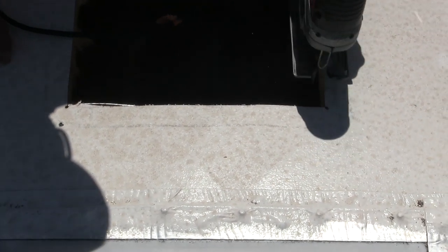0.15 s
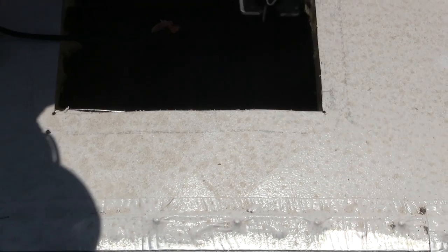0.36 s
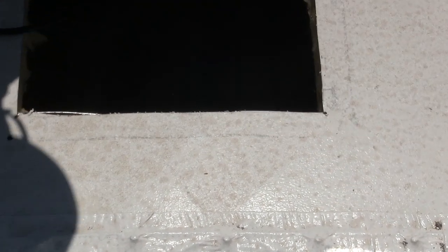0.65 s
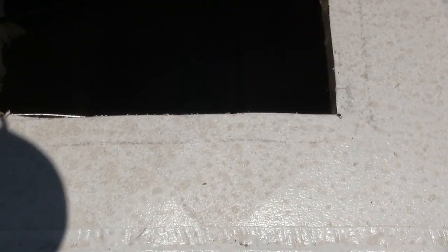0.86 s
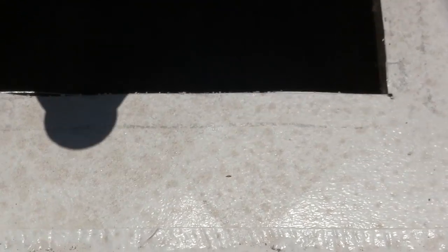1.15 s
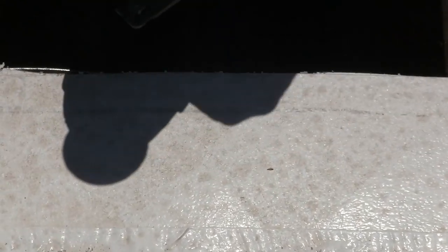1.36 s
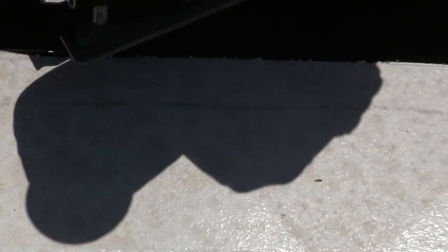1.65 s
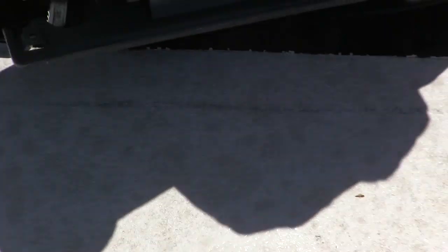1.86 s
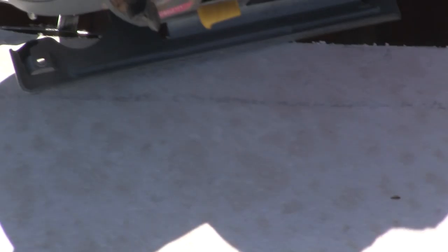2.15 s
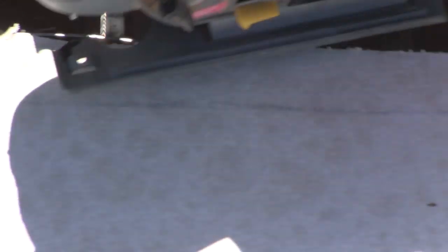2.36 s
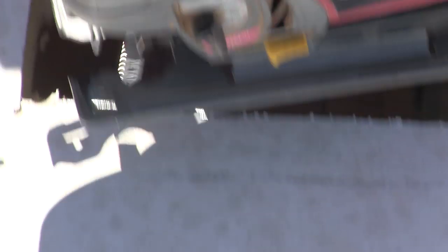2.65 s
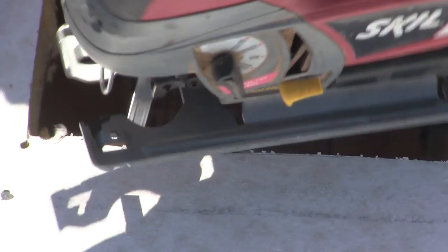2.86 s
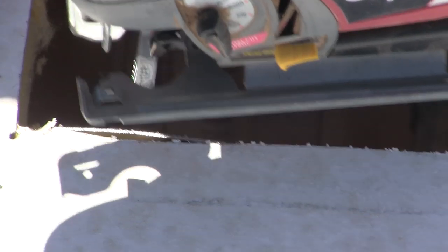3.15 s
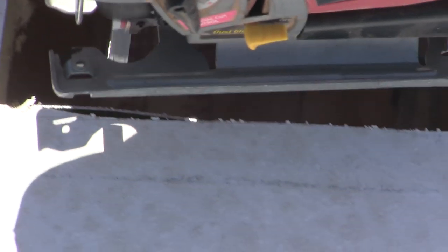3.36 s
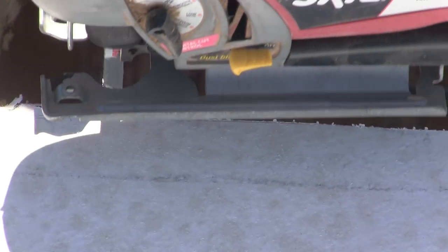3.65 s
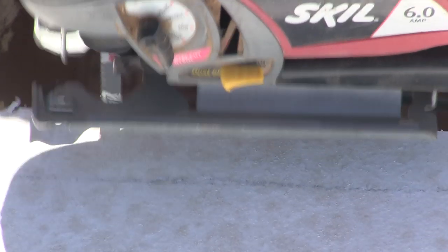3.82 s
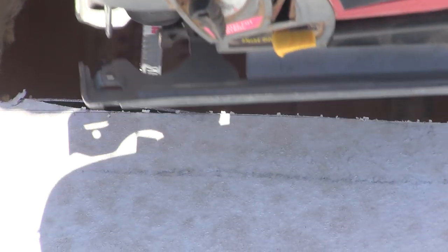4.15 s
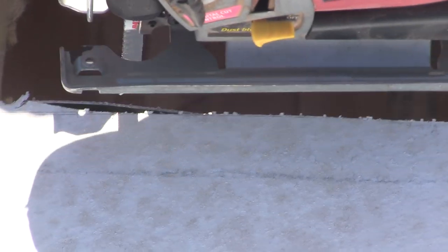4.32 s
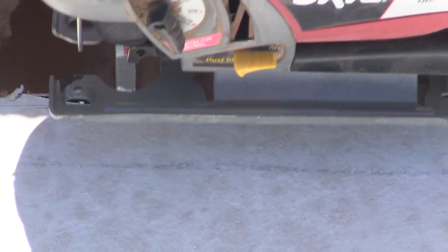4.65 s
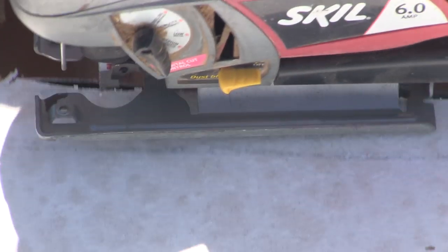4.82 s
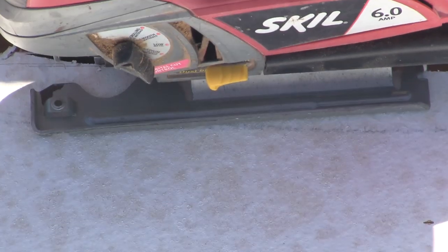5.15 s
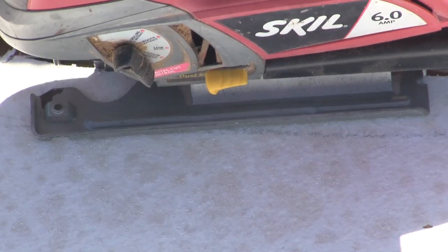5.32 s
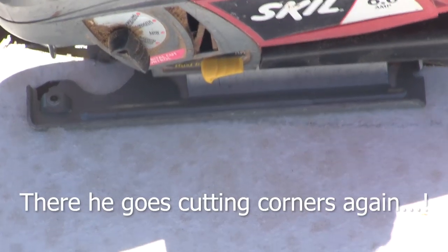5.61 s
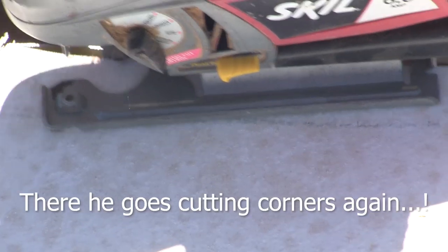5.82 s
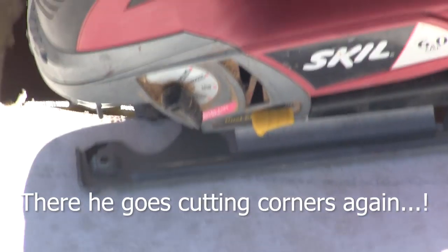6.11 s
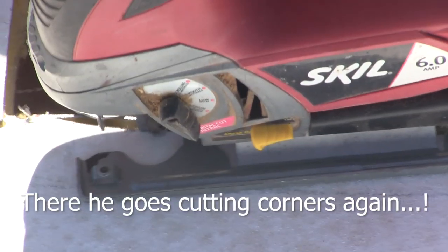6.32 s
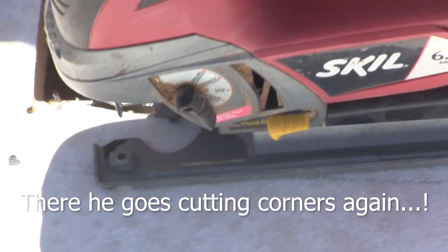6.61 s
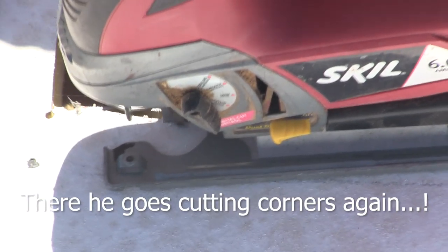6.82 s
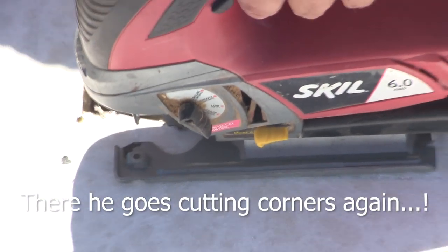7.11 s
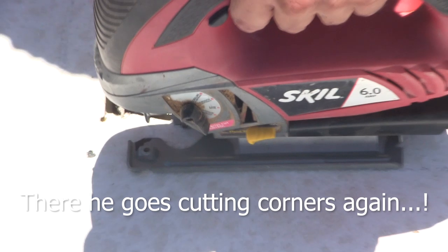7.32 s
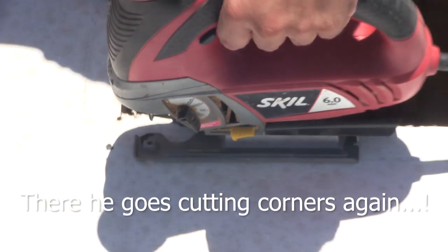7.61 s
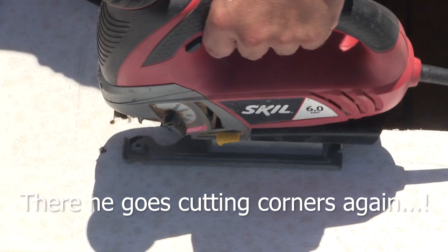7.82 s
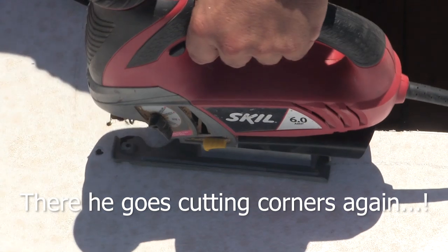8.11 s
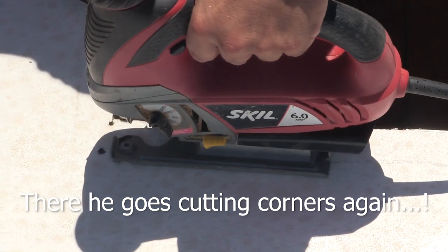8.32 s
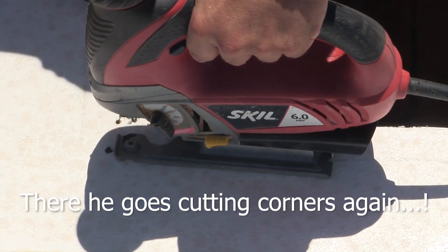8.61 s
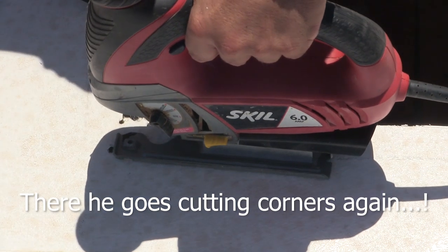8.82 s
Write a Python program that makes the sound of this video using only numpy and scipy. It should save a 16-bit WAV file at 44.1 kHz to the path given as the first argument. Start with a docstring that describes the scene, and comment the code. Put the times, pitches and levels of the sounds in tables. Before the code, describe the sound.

Close outdoor sound of a corded jigsaw on a sheet-metal roof. It has just been switched off and coasts down, hissing, rattling and whining lower, then slows to dry rasps and chirps. The shoe knocks hollowly on the sheet. After a quiet pause with faint engine hum and breeze, the trigger clicks, the motor races up chattering, and the blade cuts in a fast, gritty buzz until the end.

```python
"""A sheet-metal roof outdoors, a corded jigsaw close by. Switched off, it coasts down: hissing fan, rattling
gear and whining teeth follow the crank angle; near rest the dry teeth rasp and chirp. The shoe knocks on the
roof, ringing its modes; the trigger clicks, the saw runs up chattering on the sheet, and the blade bites once
a stroke in bursts of gritty noise that drum the sheet. The roof hums low in two sines, a faint engine tone
sounds far off, and filtered noise makes the breeze on the microphone."""
import sys
import numpy as np
from scipy import signal
from scipy.fft import rfft, irfft
from scipy.io import wavfile
from scipy.ndimage import uniform_filter1d

SR = 44100
rng = np.random.default_rng(int(sys.argv[2]) if len(sys.argv) > 2 else 0)


def log_audio(samples):
    """Write samples as a 16-bit WAV file to the path given in sys.argv[1]."""
    # one column per channel
    frames = np.atleast_2d(samples).T
    # limit to full scale, then quantise
    limited = np.clip(frames, -1, 1)
    pcm = np.round(limited * 32767).astype(np.int16)
    wavfile.write(sys.argv[1], SR, pcm)


N = 395569
T = np.arange(N) / SR
TOP_HZ = 16000

# Open air spectrum: (frequency [Hz], level [dB])
AIR_COLOUR = [(25, -32), (100, -16.5), (200, -15.5), (500, -20), (1100, -23), (2000, -34), (7000, -43),
              (12000, -44), (16000, -50)]
# Breeze rumble: (time [s], relative level [dB])
BREEZE = [(0, -66), (.45, -61), (1.2, -49.5), (1.9, -50.5), (2.8, -45), (3.2, -49), (5.45, -50.5),
          (5.7, -67), (8.97, -63)]
# Distant engine: (time [s], pitch [Hz], level [dB])
ENGINE = [(0, 121.8, -55), (1.8, 131, -80), (2.3, 130, -50.5), (4.7, 133, -46), (5.45, 144.3, -42.5),
          (5.7, 142, -72)]
# Low hum of the roof sheet, gone before the saw restarts: (frequency [Hz], level [dB])
ROOF_HUM = [(167, -43), (350, -46)]

# Roof sheet modes: (frequency [Hz], relative level [dB], t60 at damping 1 [s])
ROOF_MODES = [(174.2, -7.5, 0.19), (210.8, -3, 0.14), (236.8, -6.5, 0.19), (260.5, -2, 0.1),
              (302.2, 2.5, 0.12), (351.3, -4, 0.25), (363.3, -2.5, 0.2), (405.2, -4, 0.16), (554, -1, 0.06),
              (643, -8.5, 0.38), (752.5, -9, 0.33), (932, 8, 0.024), (1067, 5.5, 0.068), (1188, -2.5, 0.1),
              (1263, 2.5, 0.036)]
# Shoe knocks: (time [s], thud [dB], clack [dB], contact time [s], deck boom [dB])
KNOCKS = [(0.035, -23.5, -30, 0.0007, -38), (0.11, -26, -38, 0.0013, -35),
          (2.643, -22.5, -17, 0.00052, -25), (2.696, -32, -27, 0.0006, -29),
          (2.881, -16, -23.5, 0.0004, -20), (2.91, -28, -39, 0.002, -23), (2.935, -28, -47, 0.0014, -18.5),
          (3.898, -19, -22, 0.00053, -23), (3.922, -25, -28, 0.00037, -27),
          (3.945, -25.5, -42, 0.0011, -25), (4.87, -26, -41.5, 0.0008, -50), (4.912, -22, -37, 0.0011, -27),
          (4.93, -19.5, -39, 0.00086, -37), (4.951, -33, -42, 0.00083, -36), (5.033, -26, -39, 0.0011, -35),
          (5.046, -25, -47, 0.0017, -43), (5.519, -14, -21.5, 0.00038, -39), (5.531, -23, -30, 0.0012, -36),
          (5.556, -25, -25, 0.00091, -43), (5.586, -17.5, -20.5, 0.00048, -43),
          (5.621, -24, -30, 0.00065, -45)]
# Blade guide and trigger clicks: (time [s], level [dB])
CLICKS = [(1.72, -15.5), (2.046, -24), (2.727, -17), (2.791, -19), (3.213, -23), (3.327, -25.5),
          (3.461, -22.5), (3.946, -31.5), (3.978, -30), (4.215, -52), (4.436, -44), (5.437, -44),
          (5.494, -27)]
# Steel clack spectrum: (frequency [Hz], level [dB])
CLACK_COLOUR = [(300, -51), (1100, 1), (2000, 15), (3800, 11.5), (6000, 7), (9000, -1.5), (14000, 0.5),
                (16000, -13)]
# Roof rattle after a knock, spectrum: (frequency [Hz], level [dB])
KNOCK_COLOUR = [(80, -14), (190, -6), (350, 8), (600, -6), (800, -11), (1150, -4.5), (1450, -16),
                (2500, -26.5), (12000, -52)]
# Boom of the deck under the sheet, spectrum: (frequency [Hz], level [dB])
BOOM_COLOUR = [(50, -6), (100, -9.5), (160, -6), (220, 5.5), (290, -1), (400, -23), (900, -25), (4000, -70)]
KNOCK_RATTLE_DB, KNOCK_TAIL_T60_S = -9, .8  # rattle relative to thud
# A dented sheet is stiffer: pitch starts sharp by this share of its final value and slides down
DENT_SHARP_SHARE, DENT_S = .16, .06

# Sheet singing under the resting shoe: (time [s], relative level [dB])
SINGING = [(2.13, -51), (2.45, -42), (2.8, -43), (3.1, -33), (3.28, -36), (3.45, -49)]
# Sheet tones kept alive by the shoe: (frequency [Hz], relative level [dB], phase wobble [rad])
SUNG = [(348, 7, 1), (1055, -7, 0.82)]
SING_FLUTTER_DB, SING_SWELL_MAX_DB = 4, 3

# Saw shaking, strongest near the armature's turn and its doubles: (multiple of stroke rate, level [dB])
SHAKE = [(4, -5), (5, -6), (7, 0), (8, -7), (9, -3), (12, -18), (13, 2), (15, 2), (16, -20), (19, -5.5),
         (23, -8), (28, 4), (30, -3), (36, -3.5)]
# Shaken sheet, leaving the last cut and running up: (time [s], relative level [dB])
GROWL = [(0, -34.5), (0.13, -34), (0.26, -75), (5.5, -83), (5.54, -29.5), (5.63, -27.5), (5.68, -35),
         (5.78, -33.5), (5.9, -25.5), (6.0, -26), (6.08, -35), (6.22, -27.5), (6.4, -42)]
# Growl passed by the sheet: (frequency [Hz], gain [dB])
GROWL_COLOUR = [(130, -36), (205, -8.5), (340, 1), (480, 2), (620, -0.5), (730, -6.5), (950, 3.5),
                (1150, -6), (2000, -9)]
# Sheet jolts during run-up: (time [s], tone [Hz], peak level [dB])
JOLTS = [(5.66, 930, -22), (5.69, 950, -13.5), (5.73, 980, -13.5), (5.76, 1020, -15), (5.79, 1050, -14),
         (5.83, 1080, -24), (6.0, 1080, -18), (6.06, 1050, -23), (6.14, 1040, -19), (6.29, 1020, -22)]
# Shoe contact with the sheet: (start [s], length [s], relative level [dB], release [dB/s])
SCRAPES = [(0.001, 0.14, -28, 116), (2.167, 0.99, -31, 53), (4.008, 0.013, -29.5, 40),
           (5.092, .02, -46.5, 70), (5.534, 0.11, -22.5, 39), (5.856, 0.23, -21.5, 75),
           (6.123, 0.053, -23, 132)]
# Chatter spectrum: (frequency [Hz], level [dB])
CHATTER_COLOUR = [(120, -21), (180, -19), (330, 3.5), (480, 2), (620, -0.5), (760, 4), (920, -1),
                  (1080, -3), (1350, -7.5), (1900, -9), (4000, -19), (12000, -42)]
SCRAPE_ATTACK_S = 0.043

# Coasting: dry friction [strokes/s^2] and drag bring the blade to rest at STOP_S
FRICTION, DRAG_S, STOP_S = 4.547, 4.3007, 4.8312
# The fan brakes away the top of the speed [strokes/s]; the crank begins at FIRST_TURN [strokes]
FAN_SPEED, FAN_BRAKE_S, FIRST_TURN = 2.4, .45, .795
START_S, PARKED_TURN = 5.5, .157  # motor restart; crank position there [strokes]
# Blade under power: (time [s], speed [strokes/s])
DRIVE = [(5.5, 0), (5.6, 24.01), (5.72, 34.51), (5.85, 39.71), (6.0, 43.03), (6.25, 46.5), (6.7, 46.45),
         (7.7, 46.14), (8.3, 46.06), (9.0, 46.49)]
# Coasting saw swung towards the microphone: (time [s], gain [dB])
NEARNESS = [(0, -13.5), (.28, -11.5), (.9, -2), (1.25, 0), (1.7, -1.5), (2.4, 2.5), (3, 0.5), (4, 1.5),
            (4.6, -2)]

# Blade tick on its guide roller, spectrum: (frequency [Hz], level [dB])
TICK_COLOUR = [(3000, -22), (7500, -11), (9600, 17), (11000, -23), (13500, -14), (16000, 13)]
# Gear on the last slow lifts: (time [s], rasp [dB], chirp [dB])
RASP = [(2.05, -35, -42), (2.25, -28, -38), (2.4, -26, -36), (2.55, -22.5, -24), (2.65, -28, -25),
        (2.74, -29, -20), (2.83, -23.5, -23), (2.9, -32, -40), (3.0, -31, -30), (3.1, -31, -36),
        (3.45, -29.5, -50), (3.76, -30, -52), (3.9, -42, -60)]
# Rasp spectrum: (frequency [Hz], level [dB])
RASP_COLOUR = [(900, -24), (1400, -8), (1680, 3), (2150, -5), (2520, -1), (2850, 4), (3300, -11),
               (5500, -16), (16000, -38)]

# Motor and gearbox running up: (time [s], level [dB], relative treble above 6.5 kHz [dB])
RUN_UP = [(5.52, -28, -18), (5.59, -23, -12), (5.68, -25.5, -8), (5.78, -29.5, -7.5), (5.88, -21, -5.5),
          (5.96, -23, -9), (6.05, -28, -6.5), (6.15, -25, -8)]
# Motor under load: (time [s], relative level [dB])
UNDER_LOAD = [(6.3, -26), (7.2, -24), (7.7, -19.5), (8.97, -18.5)]
# Gear backlash closing: (phase [strokes], width [strokes], level [dB])
BACKLASH = [(-0.068, 0.17, -6), (-0.364, 0.016, -4.5), (0.366, 0.039, -4), (-0.083, 0.014, 1.5)]
# Open gear rattle spectrum: (frequency [Hz], level [dB])
RATTLE_COLOUR = [(59, -53), (100, -19), (147, -26), (255, -10.5), (335, -11), (424, -5.5), (570, -12),
                 (736, -4.5), (1150, -0.5), (2300, 0), (3400, 0.5), (8110, -13.5), (10500, -21),
                 (13800, -18), (16000, -27.5)]
# Loaded motor spectrum: (frequency [Hz], level [dB])
LOADED_COLOUR = [(59, -69), (100, -27), (202, -4), (389, -1), (570, -5.5), (801, -3), (1060, -1),
                 (1310, -1), (2040, -11), (2470, -5.5), (3320, -9.5), (5190, -13.5), (10700, -24.5),
                 (13200, -19), (16000, -25)]
# Gear housing modes: (frequency [Hz], relative level [dB], t60 [s])
HOUSING_MODES = [(1190, -1, 0.035), (2630, 8.5, 0.027), (5280, 14.5, 0.013), (6330, 6, 0.052),
                 (10000, 3, 0.016)]
REF_SPEED = 26  # strokes/s, where the coasting levels below hold before NEARNESS
RATTLE_DB, RATTLE_POWER, RATTLE_TREBLE_DB, TREBLE_POWER = -21, 1.133, 8, 0.51  # powers of speed

# Gearbox resonances swept by the whine partials: (frequency [Hz], gain [dB])
GEARBOX_RESONANCES = [(400, -26.5), (890, -13), (1090, -7), (1205, -7), (1340, -2), (1470, -1.5),
                      (1640, -10.5), (1850, -0.5), (2020, -3), (2290, -2), (2550, -4), (3500, -6.5),
                      (4400, -0.5), (5600, -6.5), (7300, -0.5), (8600, -6), (16000, -14)]
# Coasting whine fundamental, as the saw is swung round: (time [s], gain [dB])
WHINE_SWELL = [(0, 3), (.25, 1), (.48, -13), (.6, 1), (.68, -8), (.78, 1.5), (1.04, 1.5), (1.12, -10),
               (1.27, -6), (1.37, 1.5), (1.65, 1), (1.8, 5.5), (1.97, -8), (2.15, -2)]
CRANK_TEETH = 63
WHINE_DB, WHINE_FULL_SPEED, WHINE_POWER = -18.5, 23, 1  # coasting; speed [strokes/s]
RUN_WHINE_DB, HUSH_S, HUSH_DB_PER_S = -22.5, 6, 20  # the load presses the teeth together from HUSH_S
WHINE_SLOPE, MESH_JITTER_RAD = 1., .12  # partials fall as 1 / number ** slope
SCRAPE_SPEED, SCRAPE_JITTER_RAD = 17, 1.8  # below this [strokes/s] teeth scrape rather than sing
OVERTONE_FLICKER_DB = 3

# Push into the cut: (time [s], relative bite level [dB])
FEED = [(6.2, -22.5), (6.32, -25), (6.65, -25.5), (7.05, -25), (7.28, -29), (7.4, -26.5), (7.56, -24),
        (7.8, -24), (7.88, -26), (8.12, -24.5), (8.22, -30), (8.28, -28), (8.52, -26.5), (8.68, -24.5),
        (8.76, -25.5), (8.86, -24), (8.97, -30.5)]
# Sheet drumming more as the cut frees it: (time [s], relative level [dB])
FREEDOM = [(6.2, -25), (6.55, -12), (6.75, -9), (7.2, -8.5), (7.6, -3.5), (8.97, -1.5)]
# Strokes with a bite size of their own, nearly all skating: (time [s], size [dB])
SKATES = [(6.893, -11), (6.937, -27), (7.021, -4), (7.067, -30), (7.087, 1), (7.153, -19), (7.652, -12),
          (7.89, -11), (7.933, -4)]
# Bite spectrum: (frequency [Hz], level [dB])
BITE_COLOUR = [(200, -35), (700, -8), (1050, 5), (1400, -6.5), (2000, -4.5), (2550, 2), (3200, -4.5),
               (3800, -2.5), (4400, -4.5), (5100, -4), (7500, -12.5), (9000, -15), (11000, -22),
               (13200, -15), (16000, -25)]
# Low boom of the sheet beyond the shoe: (frequency [Hz], gain [dB])
DRUM_COLOUR = [(80, 5), (120, -8), (165, 1.5), (275, 1), (325, 0), (390, 1.5), (520, -15), (700, -5),
               (900, -28), (2000, -33)]
# Blade and guide roller modes: (frequency [Hz], relative level [dB], t60 [s])
BLADE_MODES = [(1848, 7.5, 0.049), (2420, 9, 0.0058), (2660, 2, 0.012), (3725, 17.5, 0.014),
               (5560, -19, 0.014)]
# Blade ringing more freely late in the cut: (time [s], relative level [dB])
BLADE_RING = [(8.35, -13), (8.8, -2.5)]
BITE_START, BITE_RISE, BITE_DECAY = -.165, .06, .175  # strokes


def undb(db):
    """Decibels to gain."""
    return 10 ** (np.asarray(db) / 20)


def unit(x):
    """Scale to rms 1."""
    return x / np.sqrt(np.mean(x ** 2))


def curve(rows, axis=1):
    """One table column, joined by straight lines."""
    rows = np.asarray(rows)
    return np.interp(T, rows[:, 0], rows[:, axis])


def during(rows, fade_s):
    """1 over the time a table covers, fading outside it."""
    return np.clip(1 + np.minimum(T - rows[0][0], rows[-1][0] - T) / fade_s, 0, 1)


def sine(cycles, wobble_rad=0):
    """Sine of a phase in cycles, plus a wobble."""
    return np.sin(2 * np.pi * cycles + wobble_rad)


def noise():
    """White noise."""
    return rng.standard_normal(N)


def walk(rate_hz):
    """Smooth random wander, rms 1."""
    hold = max(int(SR / rate_hz), 2)
    steps = np.repeat(rng.standard_normal(N // hold + 1), hold)
    return unit(uniform_filter1d(steps, hold)[:N])


def fade(t, t60_s):
    """Exponential decay from t = 0."""
    return (t >= 0) * undb(-60 * np.maximum(t, 0) / t60_s)


def colour(x, points, size=4096):
    """Causal minimum-phase filter with the given (frequency [Hz], gain [dB]) outline."""
    hz, db = np.transpose(points)
    f = np.maximum(np.fft.rfftfreq(size, 1 / SR), 1)
    below = np.minimum(f / hz[0], 1) ** 2
    gain = below * undb(np.interp(np.log(f), np.log(hz), db))
    cepstrum = irfft(np.log(gain))
    # fold the cepstrum to its causal half
    cepstrum[1:size // 2] *= 2
    cepstrum[size // 2 + 1:] = 0
    return signal.fftconvolve(x, irfft(np.exp(rfft(cepstrum))))[:N]


def cut_off(x, hz, kind, order=2):
    """Low-pass, high-pass or band-pass."""
    return signal.sosfilt(signal.butter(order, hz, kind, fs=SR, output="sos"), x)


def grit(rate_hz, depth_db):
    """Noise made of grains; each band has grains of its own."""
    edges_hz = [60, 900, 2000, 4000, 8000, 17000]
    total = 0
    for pair in zip(edges_hz, edges_hz[1:]):
        total = total + cut_off(noise(), pair, "band") * undb(depth_db * walk(rate_hz))
    return total


def lobe(turn, at, width):
    """A smooth bump once a stroke; position and width in strokes."""
    return np.exp(-.5 * (((turn - at + .5) % 1 - .5) / width) ** 2)


def ring_of(force, damping=1, modes=ROOF_MODES):
    """A force rings decaying modes; damping divides their t60."""
    t = T[:SR]
    ring = 0
    for k, (hz, db, t60_s) in enumerate(modes):
        ring = ring + (-1) ** k * undb(db) * fade(t, t60_s / damping) * sine(hz * t)
    return signal.fftconvolve(force, ring / np.std(ring[:SR // 50]))[:N]


def crank():
    """Crank angle [strokes] and speed [strokes/s]: coasting to rest, then driven again."""
    left_s = np.maximum(STOP_S - T, 0)
    coast = FRICTION * DRAG_S * np.expm1(left_s / DRAG_S)
    coast += FAN_SPEED * np.exp(-(T / FAN_BRAKE_S) ** 1.5)
    drive = curve(DRIVE)
    coast_turn = FIRST_TURN + np.cumsum(coast) / SR
    drive_turn = PARKED_TURN + np.cumsum(drive) / SR
    return np.where(T < START_S, coast_turn, drive_turn), coast + drive


def mesh(turn):
    """Tooth contact phase [rad]: the crank gear turns once a stroke."""
    return 2 * np.pi * CRANK_TEETH * turn


def outdoors(air_db=-48, waver_share=0.01, breeze_db=2, gust_db=-2.0):
    """Air noise, a wavering engine tone, two humming roof modes and low breeze noise on the microphone."""
    engine_hz, engine_db = curve(ENGINE), curve(ENGINE, axis=2)
    air = unit(colour(noise(), AIR_COLOUR)) * undb(air_db + 0.57 * walk(7.3))
    engine = np.sqrt(2) * sine(np.cumsum(engine_hz * (1 + waver_share * walk(16))) / SR)
    engine *= undb(engine_db + 0.78 * walk(11))
    roof_hum = sum(undb(db + 2.5 * walk(5)) * sine(hz * T, .8 * walk(12)) for hz, db in ROOF_HUM)
    roof_hum *= np.clip((5.3 - T) / 0.36, 0, 1)
    presence = undb(np.minimum(engine_db + 45, 0))  # air and roof hum sink with the engine
    breeze = unit(colour(noise(), [(20, -6), (45, -16.0), (90, -11), (200, -17.0), (800, -60.5)]))
    breeze *= undb(curve(BREEZE) + breeze_db + gust_db * walk(2.94))
    return (air + roof_hum) * presence + engine + breeze


def blow(contact_s, spot_db=3, damping=1.13):
    """Sheet ring sliding down in pitch; spots favour other modes, long contact drops high ones."""
    t = T[:SR // 2]
    spots_db = spot_db * rng.standard_normal(len(ROOF_MODES))
    slide_s = t - DENT_SHARP_SHARE * DENT_S * np.expm1(-t / DENT_S)
    slide_s /= 1 + DENT_SHARP_SHARE / 2  # centre the slide on the mode pitch
    ring = 0
    for k, (hz, db, t60_s) in enumerate(ROOF_MODES):
        ring = ring + (-1) ** k * undb(db + spots_db[k]) * fade(t, t60_s / damping) * sine(hz * slide_s)
    push = signal.windows.hann(int(contact_s * SR) + 3)
    return signal.fftconvolve(ring / np.std(ring[:SR // 50]), push / push.sum())


def knocks(clack_t60_s=0.089, click_t60_s=0.05, rattle_t60_s=0.27, tail_db=-21, ring_db=-1.5, boom_t60_s=0.15):
    """Knocks: steel clack, sheet ring, deck boom and spreading roof rattle; clicks: short steel noise."""
    body, clack, rattle_power, boom_power = np.zeros((4, N))
    t = T[:SR]
    spread = undb(KNOCK_RATTLE_DB) * fade(t, rattle_t60_s) + undb(tail_db) * fade(t, KNOCK_TAIL_T60_S)
    for s, thud_db, clack_db, contact_s, boom_db in KNOCKS:
        at, ring = int(s * SR), blow(contact_s)
        body[at:at + len(ring)] += undb(thud_db) * ring
        boom_power[at:at + SR] += (undb(boom_db) * fade(t, boom_t60_s)) ** 2
        clack[at:at + SR] += undb(clack_db) * fade(t, clack_t60_s)
        rattle_power[at:at + SR] += (undb(thud_db) * spread) ** 2
    for s, db in CLICKS:
        at = int(s * SR)
        clack[at:at + SR] += undb(db) * fade(t, click_t60_s)
    steel = clack * unit(colour(noise(), CLACK_COLOUR))
    deck = np.sqrt(boom_power) * unit(colour(noise(), BOOM_COLOUR))
    sheet = undb(ring_db) * cut_off(body, 84, "high")
    rattle = np.sqrt(rattle_power) * unit(colour(noise(), KNOCK_COLOUR))
    return steel + deck + sheet + rattle


def singing(turn, throb=0.082):
    """Two sheet modes hum under the rocking shoe, fluttering and throbbing with the stroke."""
    tone = 0
    for hz, db, wobble_rad in SUNG:
        flutter_db = np.minimum(SING_FLUTTER_DB * walk(25.06), SING_SWELL_MAX_DB)
        tone = tone + undb(db + flutter_db) * sine(hz * T, wobble_rad * walk(30))
    throbbing = unit(tone * (1 + throb * np.cos(2 * np.pi * turn)))
    return throbbing * undb(curve(SINGING) + 1.5) * during(SINGING, .04)


def growl(turn, top_multiple=36):
    """The racing saw shakes the sheet each stroke: harmonics of the stroke rate climb with speed."""
    multiples, db = np.transpose(SHAKE)
    on = during(GROWL, 0.048)
    live = on > 0
    tones = np.zeros(N)
    for k in range(int(round(multiples[0])), top_multiple + 1):
        wobble_rad = rng.uniform(0, 2 * np.pi) + .7 * walk(60)[live]
        tones[live] += undb(np.interp(k, multiples, db)) * sine(k * turn[live], wobble_rad)
    return colour(tones, GROWL_COLOUR) * undb(curve(GROWL)) * on


def jolts(turn, at=0.01, width=0.13, wobble_rad=0.42):
    """A plunger reversal each stroke makes the sheet sing out briefly as the saw gathers speed."""
    tone = sine(np.cumsum(curve(JOLTS)) / SR, wobble_rad * walk(200))
    return tone * lobe(turn, at, width) * undb(curve(JOLTS, axis=2)) * during(JOLTS, .02)


def chatter(turn, grain_db=1.5, slap=0.086, ring_db=-2, level_db=-3):
    """The loosely held shoe scrapes the sheet and slaps it twice a stroke, ringing its modes."""
    force = grit(300, grain_db) * (1 + slap * lobe(2 * turn, 0, 0.29))
    sound = unit(colour(force, CHATTER_COLOUR)) + undb(ring_db) * unit(ring_of(force, damping=0.34))
    contacts = []
    for s, length_s, db, release_db_per_s in SCRAPES:
        attack = np.clip(1 + (T - s) / SCRAPE_ATTACK_S, 0, 1)
        contacts.append(attack * undb(db - release_db_per_s * np.maximum(T - s - length_s, 0)))
    return cut_off(sound, 176, "high", order=6) * np.max(contacts, axis=0) * undb(level_db)


def ticking(turn, at=-0.32, width=0.0063, scatter_db=3, level_db=-31):
    """While the saw coasts, the loose blade ticks on its roller once a stroke: short noise bursts."""
    stroke = turn.astype(int)
    size = undb(scatter_db * rng.standard_normal(stroke.max() + 1))[stroke]
    swinging = np.clip((STOP_S - .6 - T) / .5, 0, 1)  # too slow to tick near the end
    ticks = unit(colour(noise(), TICK_COLOUR)) * lobe(turn, at, width) * size
    return ticks * swinging * undb(level_db + curve(NEARNESS))


def rasp(turn, start=-0.17, rise=0.036, hold=0.38, release=0.11, tooth_depth=0.26, wobble_rad=0.25):
    """Near rest each plunger lift loads the dry teeth: they rasp, and chirp at twice the tooth rate."""
    phase = (turn - start) % 1
    load = np.minimum(phase / rise, 1) * np.exp(-np.maximum(phase - hold, 0) / release - phase)
    toothed = grit(400, 0.95) * (1 + tooth_depth * np.cos(mesh(turn)))
    grains = unit(colour(toothed, RASP_COLOUR)) * undb(curve(RASP))
    chirp = np.sin(2 * mesh(turn) + wobble_rad * walk(250)) * undb(curve(RASP, axis=2))
    return load * during(RASP, .05) * (grains + chirp)


def gearbox(turn, speed, steady_db=-1, grain_db=3, tooth_depth=0.2, load_db=-4.5, run_treble_db=11):
    """Brushes and fan hiss; the loose gear rattles at plunger reversals, softer and duller when slow."""
    hiss = undb(steady_db) * (1 + (speed / 40) ** 4)  # the fan takes over at speed
    clusters = hiss + sum(undb(db) * lobe(turn, at, width) for at, width, db in BACKLASH)
    teeth = 1 + tooth_depth * (np.cos(mesh(turn)) + .5 * np.cos(2 * mesh(turn)))
    envelope = clusters / (hiss + .5) * teeth
    # the gear rattles openly and also rings its housing
    gear, case = (unit(colour(grit(400, grain_db) * envelope, RATTLE_COLOUR)) for _ in range(2))
    rattle = unit(gear + undb(-10.5) * unit(ring_of(case, modes=HOUSING_MODES)))
    treble = signal.sosfiltfilt(signal.butter(2, 6500, "high", fs=SR, output="sos"), rattle)
    lower = rattle - treble

    pace = speed / REF_SPEED * (T < START_S)
    coasting = lower + treble * undb(RATTLE_TREBLE_DB) * pace ** TREBLE_POWER
    coasting *= pace ** RATTLE_POWER * undb(RATTLE_DB + curve(NEARNESS))
    starting = lower + treble * undb(curve(RUN_UP, axis=2) + run_treble_db)
    starting *= undb(curve(RUN_UP)) * (T > RUN_UP[0][0]) * during(RUN_UP, 0.28)
    loaded = unit(colour(grit(300, 2.95), LOADED_COLOUR)) * undb(curve(UNDER_LOAD) + load_db)
    return coasting + starting + loaded * during(UNDER_LOAD, 0.4)


def whine(turn, speed, flutter_rad=0.74, smear_speed=38, racing_duller_db=4, width=0.08,
          steady=0.0068, overtone_steady=0.27, partials=8):
    """Teeth sing most on the lift, overtones all stroke; bursts merge at speed, roughen under power."""
    racing = (speed / smear_speed) ** 4
    powered = T > START_S
    hz, db = np.transpose(GEARBOX_RESONANCES)
    tooth_hz = np.maximum(CRANK_TEETH * speed, 1)
    crawling = np.maximum(1 - speed / SCRAPE_SPEED, 0)
    jitter_rad = MESH_JITTER_RAD + SCRAPE_JITTER_RAD * crawling + flutter_rad * powered
    phase = mesh(turn) + jitter_rad * walk(300) + .5 * walk(40)
    lift = unit(lobe(turn, 0.012, width)) ** 2
    teeth = 0
    for k in range(1, partials + 1):
        partial_hz = k * tooth_hz
        even = np.clip(racing + (overtone_steady if k > 1 else steady), 0, 1)
        answer_db = np.interp(np.log(partial_hz), np.log(hz), db)
        if k > 1:
            answer_db += OVERTONE_FLICKER_DB * walk(22.15) - racing_duller_db * racing
        else:
            answer_db += ~powered * curve(WHINE_SWELL)
        tone = np.cos(k * phase + rng.uniform(0, 2 * np.pi)) * np.sqrt(even + (1 - even) * lift)
        teeth += tone * undb(answer_db) * (partial_hz < TOP_HZ) / k ** WHINE_SLOPE
    run_db = RUN_WHINE_DB - HUSH_DB_PER_S * np.maximum(T - HUSH_S, 0)
    level_db = np.where(powered, run_db, WHINE_DB + curve(NEARNESS))
    # under power it only comes through near full speed; crawling teeth fall silent
    coasting = np.minimum(speed / WHINE_FULL_SPEED, 1) ** WHINE_POWER
    coasting *= np.minimum(speed / SCRAPE_SPEED, 1) ** 2
    return teeth * np.where(powered, np.minimum(racing, 1) ** 2, coasting) * undb(level_db)


def catches(phase, uneven=0.3, teeth_per_stroke=30):
    """Tooth after tooth catches the sheet edge: a run of sharp, unevenly timed snaps."""
    tooth = np.floor(teeth_per_stroke * phase + uneven * walk(1200))
    return unit((np.diff(tooth, prepend=0) > 0) * 1.)


def cutting(turn, scatter_db=0.4, snap_db=-4.0, crack_db=16, bite_db=2.0, drum_db=-2, ring_db=-6.5, loose=0.022):
    """On each upstroke the teeth tear the metal, ring the blade and jerk the sheet, which drums."""
    stroke, phase = np.divmod(turn - BITE_START + .008 * walk(40) + 1, 1)
    stroke = stroke.astype(int)
    size_db = scatter_db * rng.standard_normal(stroke.max() + 1)
    for s, db in SKATES:
        size_db[stroke[int(s * SR)]] = db
    size = undb(size_db)[stroke]
    grip = np.minimum(phase / BITE_RISE, 1) ** 2 * np.exp(-np.maximum(phase - BITE_RISE, 0) / BITE_DECAY)
    inside = during(FEED, 0.033)
    active = inside > .5
    snaps = undb(snap_db) * catches(phase)
    # the first tooth cracks into the edge
    jerk = np.diff((phase > BITE_RISE) * 1., prepend=0).clip(0) * size
    crack = undb(crack_db) * jerk
    tear, flex = (colour((unit(grit(500, 2.8)) + snaps) * grip * size + crack, BITE_COLOUR)
                  for _ in range(2))
    drum = ring_of((jerk + loose * noise()) * inside, damping=2.47)
    boom = colour(drum, DRUM_COLOUR)  # further out
    sing = cut_off(drum, 750, "high", order=3)  # beside the blade
    blade = ring_of(flex, modes=BLADE_MODES)
    bite = 0
    for part, db in ((tear, -1), (sing, ring_db), (blade, curve(BLADE_RING))):
        bite = bite + undb(db) * part / np.std(part[active])
    drumming = boom / np.std(boom[active]) * undb(curve(FREEDOM) + drum_db)
    return inside * undb(curve(FEED)) * (bite * undb(bite_db) + drumming)


def scene():
    """The crank angle drives gear, shoe and blade; surroundings and knocks are added."""
    turn, speed = crank()
    surroundings = outdoors() + knocks()
    sheet = singing(turn) + growl(turn) + jolts(turn) + chatter(turn)
    saw = ticking(turn) + rasp(turn) + gearbox(turn, speed) + whine(turn, speed) + cutting(turn)
    return (surroundings + sheet + saw)[None]


def record(dry):
    """Soft saturation rounds the loudest peaks; a steep low-pass cuts above TOP_HZ."""
    rounded = dry / (1 + (dry / .5) ** 4) ** (1 / 4)
    return signal.sosfilt(signal.ellip(10, .2, 70, TOP_HZ, fs=SR, output="sos"), rounded)


dry = scene()
out = record(dry)
log_audio(out)
```